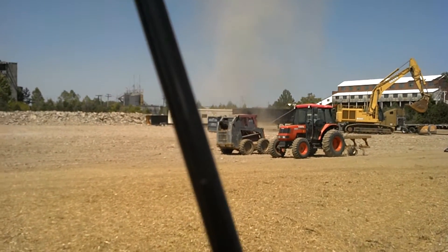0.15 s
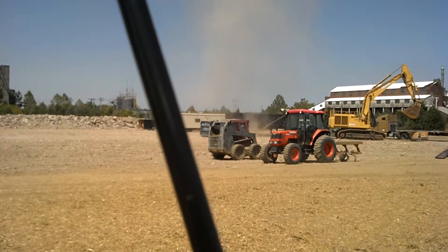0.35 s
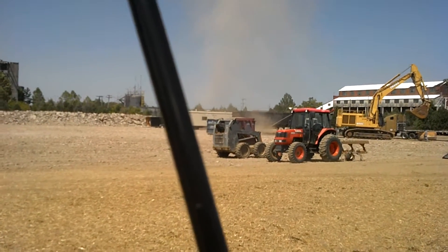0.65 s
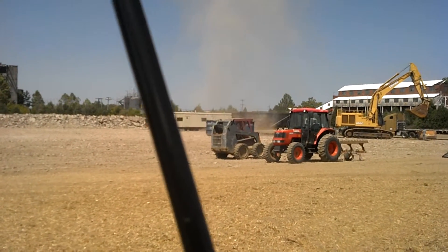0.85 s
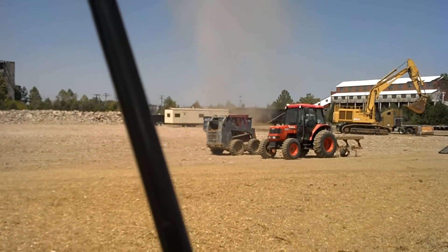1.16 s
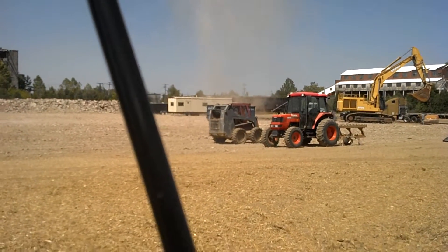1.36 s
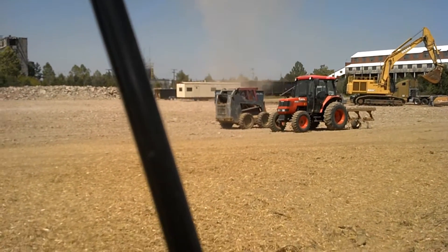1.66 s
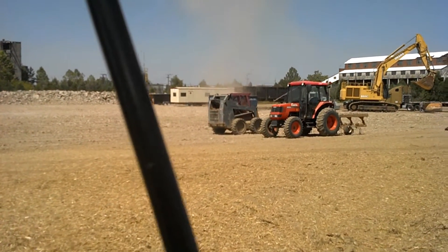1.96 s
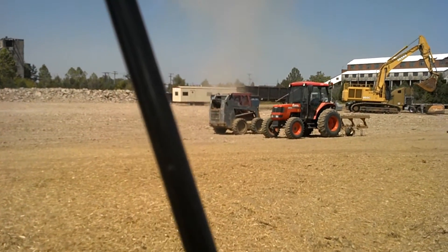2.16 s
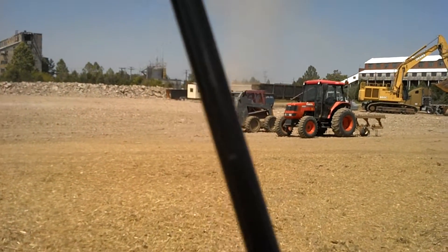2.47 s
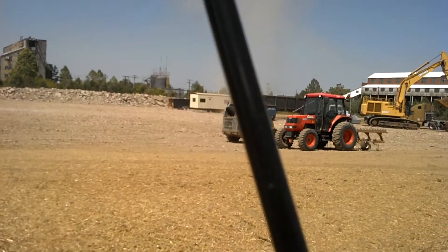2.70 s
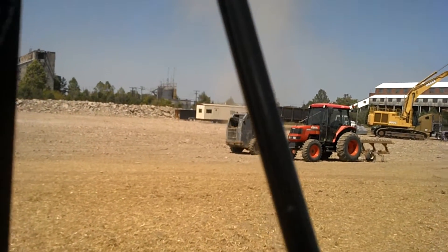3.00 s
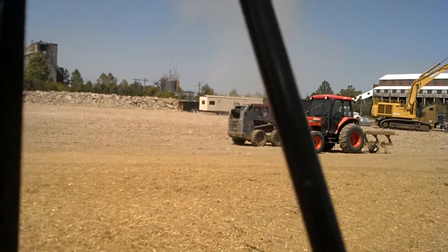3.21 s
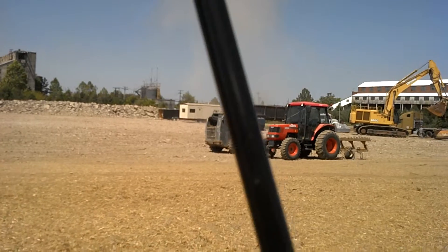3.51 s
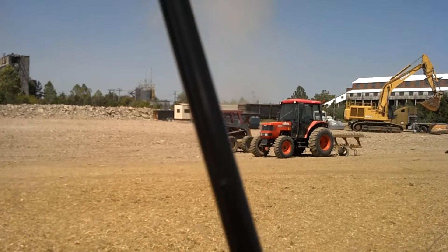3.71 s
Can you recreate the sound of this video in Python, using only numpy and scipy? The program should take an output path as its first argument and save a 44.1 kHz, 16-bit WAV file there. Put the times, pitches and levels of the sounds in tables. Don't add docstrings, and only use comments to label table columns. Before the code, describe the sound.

Rising wind with gritty gusts buffets a cab frame while a steady diesel engine drones on the left.

```python
import sys
import numpy as np
from scipy import signal
from scipy.fft import rfft, irfft, next_fast_len
from scipy.io import wavfile
from scipy.ndimage import uniform_filter1d, map_coordinates

SR = 44100
rng = np.random.default_rng(int(sys.argv[2]) if len(sys.argv) > 2 else 0)


def level_to_linear(level):
    exponent = np.asarray(level, float) / 20
    return 10 ** exponent


def bounce(signal):
    frames = np.transpose(np.atleast_2d(signal))
    limited = np.clip(frames, -1, 1)
    pcm = np.round(limited * 32767).astype(np.int16)
    wavfile.write(sys.argv[1], SR, pcm)


N = 169785
SHAFT_HZ = 39.37


def unit(x):
    return x / np.sqrt(np.mean(x ** 2) + 1e-20)


def along(points, hz):
    f, v = np.transpose(points)
    return np.interp(np.log(hz + 1), np.log(f + 1), v)


def curves(rows):
    times, *columns = np.transpose(rows)
    return [np.interp(np.arange(N) / SR, times, column) for column in columns]


def wobble(rate):
    knots = rng.standard_normal(int(N * 40 / SR) + 4)
    return map_coordinates(knots, [np.arange(N) * min(rate, 40) / SR])


def filtered(x, response):
    m = next_fast_len(N + SR // 2)
    return irfft(rfft(x, m) * response(np.fft.rfftfreq(m, 1 / SR)), m)[..., :N]


def patchy(patchy_db):
    z = signal.stft(rng.standard_normal((2, N)), nperseg=512)[2]
    field = rng.standard_normal(z.shape[1:])
    field = uniform_filter1d(uniform_filter1d(field, size=8, axis=0), size=12, axis=1)
    return signal.istft(z * level_to_linear(patchy_db * unit(field)), nperseg=512)[1][:, :N]


def widened(pair):
    lag_s = 17 / 44100
    right_share = 0.28
    pair = pair * np.sqrt([[1 - right_share], [right_share]])
    late = filtered(pair, lambda hz: np.exp(-2j * np.pi * hz * lag_s))
    return np.array([pair[0] - late[1], pair[1] - late[0]])


def engine():
    # (multiple of the shaft speed, left level [dB], right level [dB])
    orders = [(5.08, -8.5, -24), (6, 3, -38), (7.5, -15.5, -18), (9, -18, -26), (10.5, -12.5, -20.5),
              (12, -7.5, -17.5), (15, -39, -29), (18, -18, -25)]
    # (time [s], hum level [dB], boom level [dB])
    load = [(0.0, -48, -47), (0.16, -42, -60), (0.36, -42.5, -45), (1.33, -33.5, -45.5),
            (1.58, -29.5, -34.5), (1.74, -40, -35), (1.89, -31.5, -40.5), (2.25, -33.5, -36.5),
            (2.39, -27, -42), (2.55, -40.5, -32.5), (2.94, -33.5, -43), (3.12, -28, -30),
            (3.17, -36.5, -41.5), (3.38, -28, -33), (3.6, -36, -31), (3.74, -30.5, -54), (3.81, -31, -31),
            (3.85, -43, -49)]
    hum_gain_db, boom_gain_db = 4.5, 2
    boom_pan_db = 2 * np.array([[1], [-1]])
    cab_hz, cab_width_hz = 159.5, 16.5
    hum_db, boom_db = curves(load)

    turns = np.cumsum(SHAFT_HZ * (1 + 0.0019 * wobble(2.985))) / SR
    hum = 0
    for k, left_db, right_db in orders:
        sway = 1 + (0.14 + 0.05 * abs(k - 6)) * wobble(13)
        tone = np.sin(2 * np.pi * (k * turns + 0.009 * k * wobble(14)))
        hum = hum + level_to_linear([[left_db], [right_db]]) * sway * tone

    def cab(f):
        return (1j * f / (cab_hz ** 2 - f * f + 1j * f * cab_width_hz)) ** 2

    boom = unit(filtered(rng.standard_normal(N), cab))
    boom = unit(boom + 1.15 * np.sin(8 * np.pi * turns))
    return level_to_linear(hum_gain_db + hum_db) * hum + level_to_linear(boom_gain_db + boom_db + boom_pan_db) * boom


def roar():
    # (frequency [Hz], level [dB])
    left_colour = [(20, -41), (67, -15.5), (80, -1), (280, -3), (330, -7), (560, -11.5), (1030, -21),
                   (1250, -77)]
    right_colour = [(20, -40), (67, -10.5), (80, -10.5), (260, -2.5), (430, -6), (700, -13), (1030, -16.5),
                    (1200, -73.5)]
    # (frequency [Hz], likeness [-1 opposite to 1 same])
    alike = [(30, -0.65), (125, -0.69), (200, -0.0042), (330, -0.083), (500, 0.53), (1000, 0.31)]
    # (frequency [Hz], level [dB])
    far_colour = [(600, -55), (1050, -0.5), (1400, -5), (1700, -4.5), (2200, -6), (2700, -5.5),
                  (4000, -12.5), (9000, -21)]
    near_db, far_db = 9.5, -2.5

    def mid_and_side(hz):
        angle = np.arccos(np.clip(along(alike, hz), -1, 1)) / 2
        return np.array([np.cos(angle), np.sin(angle)])

    mid, side = filtered(patchy(patchy_db=0.0), mid_and_side)
    near = filtered(np.array([mid + side, mid - side]),
                    lambda hz: level_to_linear([along(left_colour, hz), along(right_colour, hz)]))
    far = filtered(patchy(patchy_db=0.79), lambda hz: level_to_linear(along(far_colour, hz)))
    throb = 1 + 0.11 * np.sin(2 * np.pi * (SHAFT_HZ * np.arange(N) / SR + 0.1 * wobble(5.08)))
    near = level_to_linear(near_db + 1.05 * wobble(7.9)) * throb * unit(near)
    return near + level_to_linear(far_db + 0.35 * wobble(7.4)) * widened(unit(far))


def grit():
    # (frequency [Hz], level [dB])
    hiss_colour = [(1500, -10), (3500, 4), (5200, -5.5), (6200, 3.5), (9000, 2.5), (15000, 1),
                   (15700, -4.5)]
    grains_per_s, grain_spread_db, grain_share = 3000, 2.5, 0.3
    hit = rng.random((2, N)) < grains_per_s / SR
    strength = level_to_linear(grain_spread_db * rng.exponential(size=(2, N)))
    grains = hit * rng.choice([-1, 1], (2, N)) * strength
    mix = patchy(patchy_db=0.65) + grain_share * unit(grains)
    hiss = unit(filtered(mix, lambda hz: level_to_linear(along(hiss_colour, hz))))
    flutter_db = 0.7 * wobble(12) + 0.7 * wobble(30)
    return level_to_linear(6 + flutter_db) * widened(hiss)


def thumps():
    # (time [s], level [dB], pitch [Hz])
    puffs = [
        (0.101, -26, 118),
        (.672, -21, 105),
        (1.675, -8.5, 119),
        (3.751, -21, 89.5),
    ]
    rise_s, body_t60_s = 0.003, 0.11
    snap_hz, snap_db, snap_t60_s = 222, 6, 0.026
    low_hz, pan_db = 75, 1
    out, t = np.zeros(N + SR), np.arange(SR // 5) / SR
    rise = 1 - np.exp(-(t / rise_s) ** 2)
    snap = -level_to_linear(snap_db - 60 * t / snap_t60_s) * np.sin(2 * np.pi * snap_hz * t)
    for start_s, db, hz in puffs:
        body = -level_to_linear(-60 * t / body_t60_s) * np.cos(2 * np.pi * hz * (t - 0.001))
        out[round(start_s * SR):][:len(t)] += level_to_linear(db) * rise * (snap + body)
    out = filtered(out[:N], lambda f: (1j * f / (low_hz + 1j * f)) ** 2)
    return out * [[level_to_linear(pan_db)], [-level_to_linear(-pan_db)]]


def whistle():
    # (time [s], pitch [Hz], level [dB])
    path = [
        (1.95, 205, -48),
        (2.2, 238, -36),
        (2.5, 266, -33),
        (2.9, 258, -36),
        (3.2, 252, -35),
        (3.45, 240, -42),
    ]
    hz, db = curves(path)
    t = np.arange(N) / SR
    on = (t > path[0][0]) & (t < path[-1][0])
    turns = np.cumsum(hz * (1 + 0.0073 * wobble(13))) / SR
    tone = on * level_to_linear(db + 1.8 * wobble(3.3)) * np.sin(2 * np.pi * turns)
    return tone * level_to_linear([[-10], [3]])


def scene():
    # (time [s], level [dB])
    wind = [(0, -54.5), (.2, -52.5), (1.14, -43), (1.6, -41), (2.05, -36), (2.55, -36.5), (2.7, -38),
            (3.15, -36.5), (3.3, -38.5), (3.85, -37)]
    # (time [s], level [dB])
    gusts = [(0.0, -72), (0.1, -66.5), (0.17, -70.5), (1.46, -57.5), (1.6, -46.5), (1.74, -50.5),
             (1.89, -45), (1.94, -47), (2.07, -44.5), (2.56, -42.5), (2.6, -46), (3.08, -43), (3.21, -45.5),
             (3.3, -51.5), (3.33, -47), (3.51, -52), (3.73, -48.5), (3.85, -43)]
    (wind_db,), (gust_db,) = curves(wind), curves(gusts)
    return engine() + level_to_linear(wind_db) * roar() + level_to_linear(gust_db) * grit() + whistle() + thumps()


def low_pass(x):
    return signal.sosfilt(signal.butter(12, 16270, fs=SR, output="sos"), x)


def record(dry):
    top_hz = 15730
    mix = filtered(dry, lambda hz: hz < top_hz)
    return low_pass(mix)


dry = scene()
out = record(dry)
bounce(out)
```